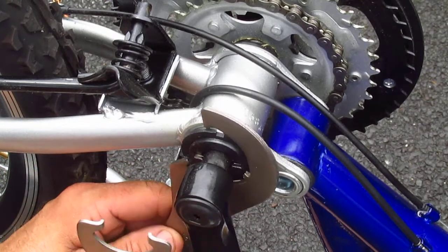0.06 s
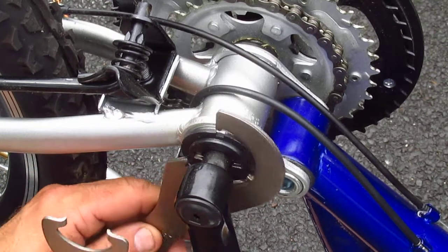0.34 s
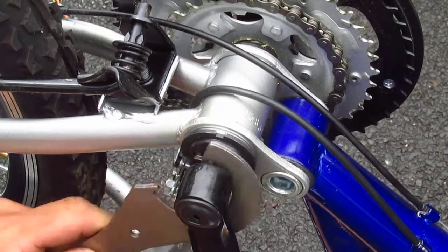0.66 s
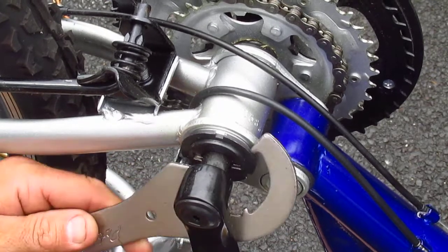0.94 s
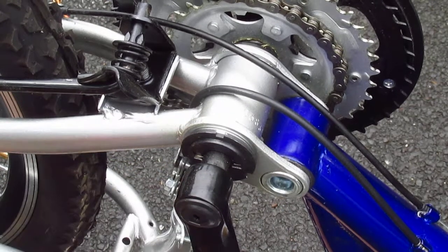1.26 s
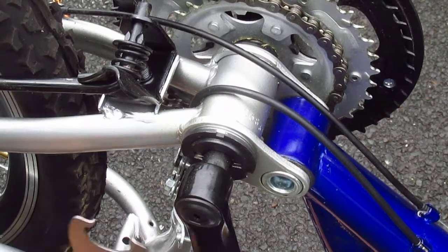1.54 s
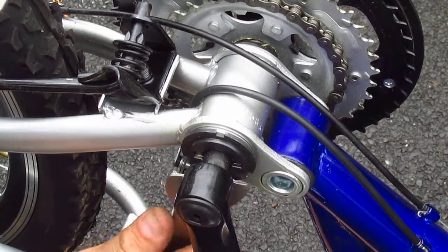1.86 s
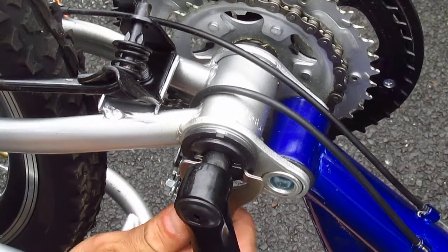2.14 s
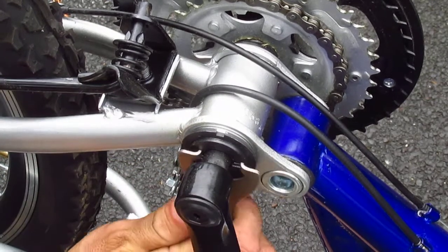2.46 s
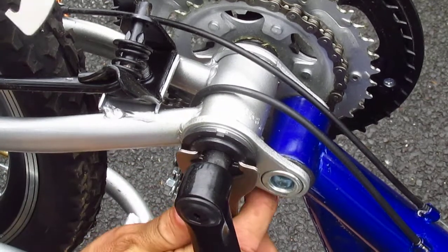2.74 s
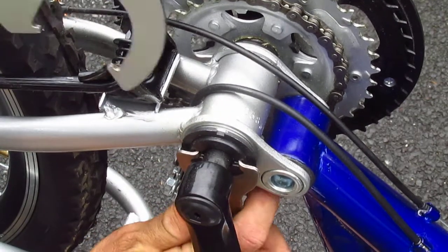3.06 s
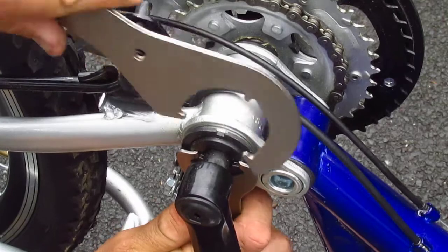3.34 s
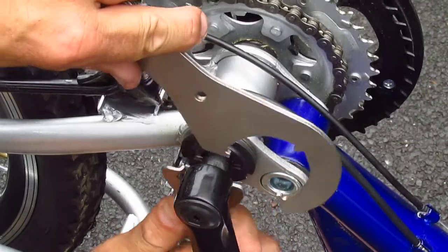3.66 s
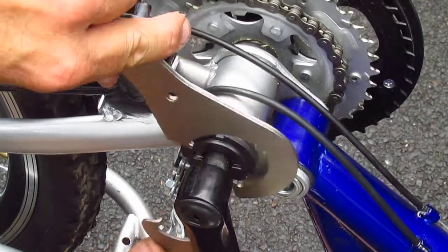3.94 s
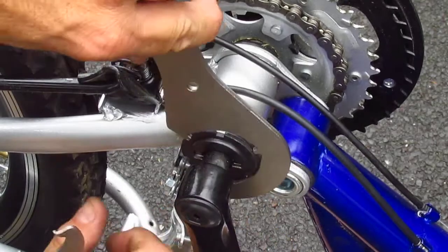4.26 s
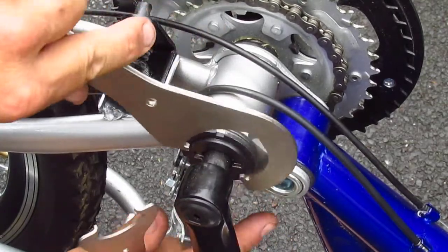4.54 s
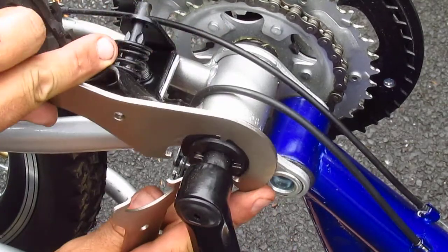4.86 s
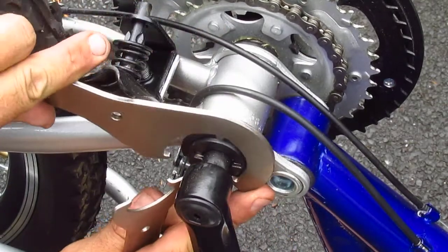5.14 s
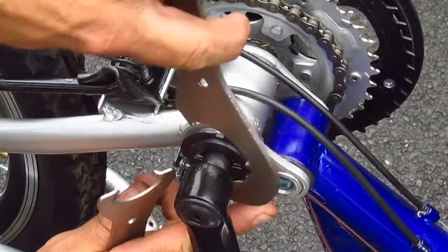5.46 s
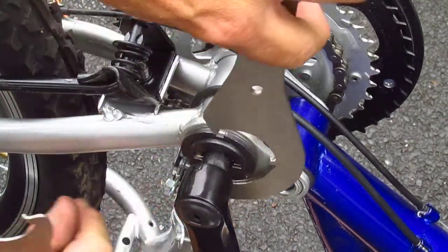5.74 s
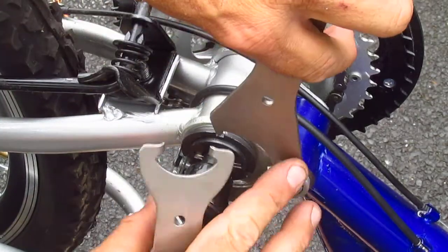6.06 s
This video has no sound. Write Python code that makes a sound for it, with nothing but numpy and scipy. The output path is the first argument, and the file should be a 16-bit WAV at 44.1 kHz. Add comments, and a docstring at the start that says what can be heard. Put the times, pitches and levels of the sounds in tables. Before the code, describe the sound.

Outdoors, close to the microphone, a flat steel hook spanner taps and scrapes on a bicycle's lock ring, with sharp, bright clinks loudest from about 0.5 to 1.1 seconds. After a short gap, a thin open wrench clacks and scrapes onto the bearing cup from 1.8 to 2.7 seconds. The tools rest until a single clack at 3.6 seconds. The spanner comes back with lighter taps and slides, a dull knock in the bicycle near 3.9 seconds and a tiny high squeak at 4.1. A quick cluster of hard, ringing clinks follows from 5.4 to 5.8 seconds, with one more at about 6.1. Underneath runs a soft wash of distant traffic and a faint low hum. From about 1.4 seconds, one far engine rumbles, speeding up and slowing down. The background dips after the hardest clinks and slowly recovers.

```python
"""Outdoors, at a bicycle: two flat steel wrenches are fitted to the bottom bracket.
A hook spanner clinks, slides and squeaks on the lock ring; a thin open wrench clacks and scrapes
onto the bearing cup. Blows and stick-slip ring each tool's bending modes; a few blows ring the bicycle.
Behind them: one far engine speeding up and slowing down, a wash of distant traffic, a faint hum.
A gain control ducks everything after the hardest clinks and recovers slowly."""
import sys
import numpy as np
from scipy import signal
from scipy.io import wavfile

SR = 44100
rng = np.random.default_rng(int(sys.argv[2]) if len(sys.argv) > 2 else 0)


def int16_out(signal):
    """Quantize to a 16-bit WAV file."""
    q = np.round(np.clip(np.atleast_2d(signal).T, -1, 1) * 32767)
    wavfile.write(sys.argv[1], SR, q.astype(np.int16))


N = 273754
TIME = np.arange(N) / SR
RING_TIME = np.arange(SR // 3) / SR


def from_db(db):
    return 10 ** (np.asarray(db) / 20)


def rms(x):
    return np.sqrt(np.mean(x ** 2) + 1e-20)


def at_hz(spectrum, hz):
    """Table value at hz, interpolated over log frequency."""
    knots_hz, values = np.transpose(spectrum)
    return np.interp(np.log(hz), np.log(knots_hz), values)


def drift(rate_hz):
    """Random curve, spread about one."""
    knots = rng.standard_normal(int(N / SR * rate_hz) + 2)
    return np.interp(TIME * rate_hz, np.arange(len(knots)), knots)


def decay(t60_s):
    return from_db(-60 * RING_TIME / t60_s)


def add(out, start_s, sound):
    start = int(start_s * SR)
    out[:, start:start + sound.shape[1]] += sound[:, :N - start]


def is_wrench(t_s):
    """Open wrench in use; hook spanner before and after."""
    return 1.6 < t_s < 3.7


# Steel on steel; thud is large for a blow square into the bracket:
# t/s, level/dB, treble reach f/Hz, thud re upper bands/dB, free ring/dB
BLOWS = [(0.035, -39, 9900, -17, -25), (0.1246, -20, 6250, -5, -41), (0.2945, -33, 8400, -8, -30),
         (0.336, -38, 12500, -6, 0), (0.4879, -9.5, 12800, -13.5, -8), (0.5056, -4, 9100, -26, -21),
         (0.5927, -11.5, 9500, -12.5, -19), (0.6955, -28, 10400, -10, -35), (0.78, -19, 11100, -7.5, -2),
         (0.8192, -4, 14400, -13.5, -13), (0.934, -22.5, 11400, 1, -7), (0.9912, -2.5, 11500, -16, -23),
         (1.1427, -12, 14200, -12, -8.5), (1.823, -12, 11900, -24, -10), (1.935, -13.5, 11500, -17.5, -24),
         (2.04, -19.5, 12400, -27, -9.5), (2.0608, -10, 11500, -21, -14), (2.077, -12, 11300, -27, -11),
         (2.167, -28, 10100, -13, -23), (2.3778, -15, 11700, -19, -27), (2.4805, -10, 11800, -14.5, -29),
         (2.61, -8, 12100, -15.5, -33), (2.719, -6.5, 10000, -17, -11), (3.6341, -12, 16000, -15, -38),
         (3.839, -35, 12130, 1, -31), (3.93, -15, 12300, -11, -31), (3.942, -24.5, 11500, -7, -14),
         (3.994, -34.5, 12500, 2, -13), (4.3902, -23.5, 9520, -9, -25), (4.4096, -25.5, 10000, -7, -30),
         (5.216, -24.5, 9700, -14, -13), (5.2666, -34.5, 9600, -10, 0), (5.4367, -14.5, 11900, -5, -1),
         (5.4515, -9, 8800, -16, -24), (5.5217, -7, 9400, -11, -7), (5.5504, -5.5, 10930, -14, 2),
         (5.6843, -2, 9200, -22.5, 2), (5.71, -10, 9100, -16, 11), (5.756, -17, 8800, -16, -2.5),
         (5.906, -22.5, 8600, -12.5, -4), (6.128, -9.5, 9200, -16.5, -7)]


def blows(rebounds_per_ms=3.0, rebound_gain=0.71, contact_s=0.0073, choke_db=-7):
    """A first touch and a few milliseconds of tiny rebounds; each touch chokes the earlier ring."""
    out = np.zeros((2, N))
    for start_s, level_db, reach_hz, thud_db, free_db in BLOWS:
        wrench = is_wrench(start_s)
        start = int(start_s * SR)
        ringing = slice(start, start + len(RING_TIME))
        out[:, ringing] *= from_db(choke_db * np.clip((TIME[ringing] - start_s) / contact_s, 0, 1))
        chatter_ms = 3.5 if wrench else 2.0
        size = int(chatter_ms * SR / 1000)
        force = rebound_gain * rng.standard_normal(size)
        force *= rng.random(size) < rebounds_per_ms * 1000 / SR
        force[0] = 1
        levels = from_db(level_db) * band_shares(wrench, reach_hz, thud_db)
        add(out, start_s, contact(force, tool_response(wrench, free_db), levels, contact_s))
    return out


# Edge sliding on the bracket: start t/s, end t/s, level/dB, treble reach f/Hz, thud re upper bands/dB
SCRAPES = [(0.137, 0.353, -43.5, 12000, -17), (0.388, 0.426, -35.5, 11200, -16),
           (0.493, 0.509, -14, 10600, -11), (0.788, 0.812, -24.5, 12000, -5),
           (0.825, 0.866, -18, 13400, -5), (2.295, 2.34, -22.5, 11200, -15.5),
           (2.361, 2.364, -34, 12500, -18), (2.435, 2.474, -31.5, 11600, -14),
           (2.557, 2.61, -28.5, 10300, -11), (2.693, 2.747, -25.5, 10300, -10.5),
           (3.588, 3.627, -47, 14000, -12), (4.062, 4.129, -33.5, 12000, 0.5),
           (4.423, 4.491, -32, 11400, -7), (4.547, 4.581, -38, 9700, -2.5),
           (5.178, 5.195, -35.5, 12000, -4), (5.351, 5.397, -33.5, 9500, -10.5),
           (5.418, 5.441, -34, 9900, -20), (5.453, 5.471, -16, 8800, -25),
           (5.488, 5.515, -31.5, 11000, -24), (5.786, 5.813, -29, 9200, -11)]


def scrapes(slips_per_s=1400, uneven_db=5.0, free_db=-17):
    """An edge catches and slips on rough steel in unequal steps."""
    out = np.zeros((2, N))
    for start_s, end_s, level_db, reach_hz, thud_db in SCRAPES:
        wrench = is_wrench(start_s)
        contact_s = max(end_s - start_s, 0.005)
        size = int(contact_s * SR)
        slips = (rng.random(size) < slips_per_s / SR) * rng.choice([-1, 1], size)
        pressure = np.linspace(0, 1, size) ** 0.087  # the hand leans in
        slip_db = uneven_db * np.minimum(rng.exponential(1, size), 4)
        force = pressure * slips * from_db(slip_db)
        levels = from_db(level_db) * band_shares(wrench, reach_hz, thud_db)
        add(out, start_s, contact(force, tool_response(wrench, free_db), levels, contact_s))
    return out


# Bending modes of each tool: f/Hz, relative level/dB, t60/s at 0 dB free ring
SPANNER_MODES = [(1477, -14, 0.13), (2170, -13.5, 0.11), (2460, -12.5, 0.23), (2760, -21.5, 0.22),
                 (3114, -8.5, .04), (3283, -9, .12), (3567, -10, .028), (4124, -8, 0.057),
                 (4220, -2, 0.083), (4800, -6.5, 0.016), (5466, 2.5, 0.14), (5970, 1, .11),
                 (6370, -1.5, 0.11), (6867, 1.5, 0.16), (8360, 0.5, 0.14), (8750, 2, 0.25),
                 (9700, 2.5, 0.11), (9870, 4, 0.069), (11470, 4, 0.13), (12740, 10, 0.25), (14960, -8, .28)]
WRENCH_MODES = [(3484, -7, 0.04), (4090, -15, 0.078), (4890, -9, 0.083), (6200, 5.5, 0.12),
                (7120, -11, 0.096), (8414, 8.5, 0.15), (9000, 1, .08), (10020, -0.5, 0.14),
                (10320, 3.5, .07), (11600, -3, 0.066), (11770, 0, 0.07), (13630, -4.5, 0.22)]


def tool_response(wrench, free_db, pressed_t60_s=0.026, crack_db=6, tail_db=-25):
    """One tap: modes choked by the contact, free ring, the bracket's dense crack, faint outdoor tail."""
    modes = np.zeros((2, len(RING_TIME)))
    t60_scale = from_db(0.092 * free_db)  # firmer grip: weaker and shorter ring
    for hz, level_db, t60_s in (WRENCH_MODES if wrench else SPANNER_MODES):
        strike_point_db = 1.5 * rng.standard_normal()
        beaming_db = 2 * rng.standard_normal((2, 1))
        phase = np.pi * rng.integers(2) + 0.83 * rng.standard_normal((2, 1))
        wave = np.sin(2 * np.pi * hz * RING_TIME + phase)
        envelope = decay(pressed_t60_s) + from_db(free_db) * decay(t60_scale * t60_s)
        modes += from_db(level_db + strike_point_db + beaming_db) * wave * envelope
    noise = rng.standard_normal((3, len(RING_TIME)))
    mid, sides = noise[0], noise[1:]
    crack = from_db(crack_db) * (mid + 0.56 * sides) * decay(t60_s=0.055)
    tail = from_db(tail_db) * sides * decay(t60_s=0.73)
    # Small parts radiate lows poorly; no touch is short enough to fill the very top.
    thin = signal.lfilter(*signal.butter(1, 2200, "high", fs=SR), crack + tail)
    return modes + signal.sosfilt(signal.butter(4, 13500, fs=SR, output="sos"), thin)


def band(x, low_hz, high_hz, order=2):
    return signal.sosfilt(signal.butter(order, [low_hz, high_hz], "band", fs=SR, output="sos"), x)


# Edges of the low, middle, high and top contact bands: f/Hz
BAND_EDGES = [300, 4000, 7700, 11000, 15800]


def contact(force, response, levels, contact_s):
    """Force drives the steel; each band is scaled to its rms level over the contact time."""
    sound = signal.fftconvolve(response, force[None], axes=1)
    out = 0
    for low_hz, high_hz, level in zip(BAND_EDGES, BAND_EDGES[1:], levels):
        part = band(sound, low_hz, high_hz, order=3)
        out += level * part / rms(part[:, :int(contact_s * SR)])
    return out


# Hard-contact balance of each tool: relative level/dB in the middle, high, top band
SPANNER_BALANCE = [-0.5, 3, 2]
WRENCH_BALANCE = [-5, -0.5, -3]


def band_shares(wrench, reach_hz, thud_db, rolloff_order=4.7):
    """Band amplitudes at unit power: thud takes the lows; soft, longer contacts lose the top."""
    centres_hz = np.convolve(BAND_EDGES[1:], [0.5, 0.5], "valid")
    balance = from_db(WRENCH_BALANCE if wrench else SPANNER_BALANCE)
    upper = balance / np.hypot(1, (centres_hz / reach_hz) ** rolloff_order)
    shares = np.r_[from_db(thud_db), upper / np.linalg.norm(upper)]
    return shares / np.linalg.norm(shares)


# Tones of the spanner's plate: f/Hz, level/dB
SQUEAK_TONES = [(4230, -34.5), (6020, -38.5)]


def squeak(start_s=4.075, length_s=0.078, pitch_waver=0.0143, rough_db=4):
    """The hook seats in the lock ring; fast stick-slip holds two tones that swell and fade."""
    swell = np.sin(np.pi * np.clip((TIME - start_s) / length_s, 0, 1))
    phase_per_hz = 2 * np.pi * np.cumsum(1 + pitch_waver * drift(120)) / SR
    out = 0
    for hz, level_db in SQUEAK_TONES:
        out += from_db(level_db + rough_db * drift(150)) * np.sin(hz * phase_per_hz)
    return swell * out


# Bicycle parts rung by blows: t/s, f/Hz, level/dB
KNOCKS = [(0.126, 1760, -27.5), (0.497, 380, -25.5), (3.931, 1080, -24.5), (5.439, 1524, -32)]


def knocks(t60_s=0.074):
    """A blow passes through the bracket and excites one mode of the frame or chainring."""
    out = np.zeros((2, N))
    for start_s, hz, level_db in KNOCKS:
        ring = np.sin(2 * np.pi * hz * RING_TIME) * decay(t60_s)
        add(out, start_s, from_db(level_db) * ring[None])
    return out


# Engine run: t/s, firing f/Hz, base level/dB
ENGINE_RUN = [(0, 30, -55), (1.22, 26.6, -50), (1.38, 30.8, -32.5), (1.72, 35, -29.5), (2.24, 36, -35),
              (2.45, 32, -33.5), (2.6, 35.3, -30), (3.02, 34, -36), (3.13, 31.3, -27), (3.44, 35.8, -23),
              (3.8, 33.3, -24.5), (4.12, 33.6, -33.5), (4.4, 32.3, -25.5), (4.98, 22.5, -27.5),
              (5.32, 28.8, -26), (5.62, 30.7, -33), (6.02, 30.8, -37.5), (6.2, 31.7, -21)]
# Exhaust orders: multiple of the firing rate, relative level/dB
EXHAUST_ORDERS = [(2, 0.5), (3, -0.5), (4, 0), (5, -5), (6, 1), (7, -8.5), (9, -6.5)]
# Response of exhaust pipe and sound path: f/Hz, gain/dB
EXHAUST_RESPONSE = [(45, -9), (56, -7), (65, 0.5), (71, -8), (83, 2.5), (100, -4.5), (114, -10.5),
                    (135, -16), (165, -21), (200, -9), (222, -25), (320, -20.5)]


def engine(waver_db=1.0):
    """Only low exhaust orders carry this far; each swells as the speed takes it through a resonance."""
    knots_s, knots_hz, knots_db = np.transpose(ENGINE_RUN)
    firing_hz = np.interp(TIME, knots_s, knots_hz)
    base_db = np.interp(TIME, knots_s, knots_db)
    firing_phase = 2 * np.pi * np.cumsum(firing_hz) / SR
    out = 0
    for order, order_db in EXHAUST_ORDERS:
        response_db = at_hz(EXHAUST_RESPONSE, order * firing_hz)
        gain = from_db(base_db + order_db + response_db + waver_db * drift(14))
        out += gain * np.cos(order * firing_phase + rng.uniform(0, 2 * np.pi))
    return np.sqrt(2) * out


# Traffic spectral density: f/Hz, relative level/dB
TRAFFIC_SPECTRUM = [(25, -1.5), (55, 13.5), (130, 10.5), (220, 3), (350, 0), (550, -4), (950, 0.5),
                    (1600, -4), (2600, -11.5), (4500, -12.5), (8000, -22), (11500, -15.5), (15000, -49)]
# Traffic stereo image: f/Hz, left-right correlation
TRAFFIC_CORRELATION = [(100, 0.94), (250, 0.85), (500, 0.86), (1200, 0.24), (3000, 0.067)]


def traffic(level_db=-36, waver_db=1.5):
    """Wash of far tyres and motors: alike on both sides in the bass, diffuse above."""
    edges_hz = 22 * 2 ** np.arange(0, 9.6, 0.5)
    white = rng.standard_normal((2, 2, N))
    out = 0
    for k, (low_hz, high_hz) in enumerate(zip(edges_hz, edges_hz[1:])):
        mid, side = band(white[k % 2], low_hz, high_hz)  # adjacent bands independent
        centre_hz = np.sqrt(low_hz * high_hz)
        correlation = at_hz(TRAFFIC_CORRELATION, centre_hz)
        stereo = np.sqrt(1 + correlation) * mid + np.sqrt(1 - correlation) * side * [[1], [-1]]
        out += from_db(at_hz(TRAFFIC_SPECTRUM, centre_hz) + waver_db * drift(12)) * stereo
    return from_db(level_db) * out / rms(out)


def hum(hz=50, level_db=-47):
    """Faint, steady low tone."""
    return from_db(level_db) * np.sin(2 * np.pi * hz * TIME)


def scene(left_db=0.53, right_db=-1.5):
    """Tools close by, slightly left, over the far engine and traffic."""
    tools = (blows() + scrapes() + squeak()) * from_db([[left_db], [right_db]])
    return tools + knocks() + engine() + traffic() + hum()


def smooth(x, tau_s):
    pole = np.exp(-1 / (tau_s * SR))
    return signal.lfilter([1 - pole], [1, -pole], x)


def gain_control(x, threshold_db=-18, sense_s=0.0056, attack_s=0.0024, release_s=0.96):
    """Ducks fast by the excess over the threshold, then creeps back up."""
    power = smooth(np.mean(x ** 2, axis=0), sense_s)
    excess_db = np.maximum(10 * np.log10(power + 1e-12) - threshold_db, 0)
    release = np.exp(-TIME / release_s)
    held_db = np.maximum.accumulate(excess_db / release) * release
    return x * from_db(-smooth(held_db, attack_s))


def record(dry, cutoff_hz=15850):
    """Gain control, clipping of the peaks that slip past it, steep low-pass."""
    lowpass = signal.ellip(10, 0.1, 90, cutoff_hz, fs=SR, output="sos")
    return signal.sosfilt(lowpass, np.clip(gain_control(dry), -1, 1))


dry = scene()
out = record(dry)
int16_out(out)
```